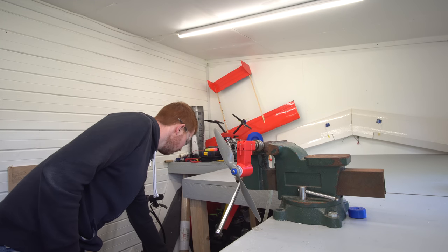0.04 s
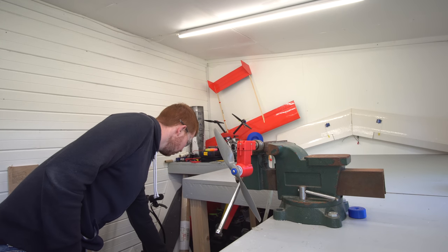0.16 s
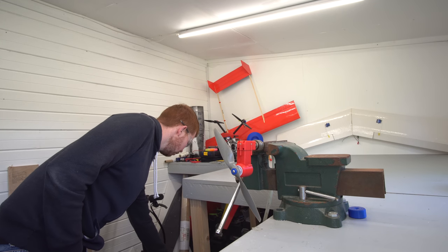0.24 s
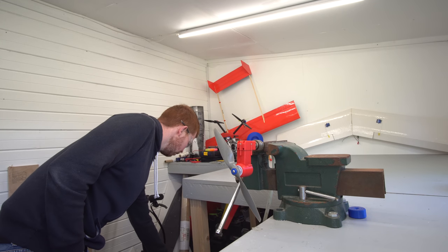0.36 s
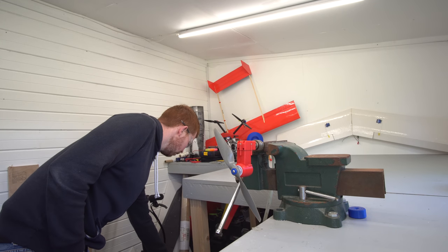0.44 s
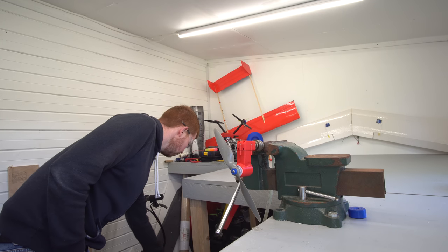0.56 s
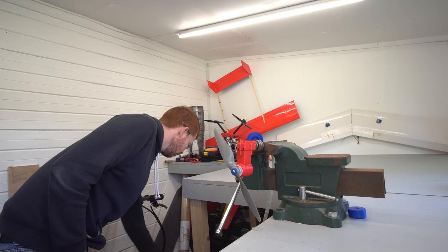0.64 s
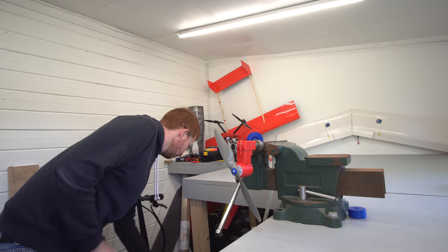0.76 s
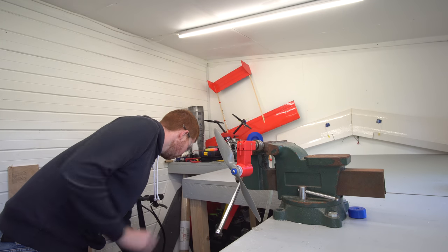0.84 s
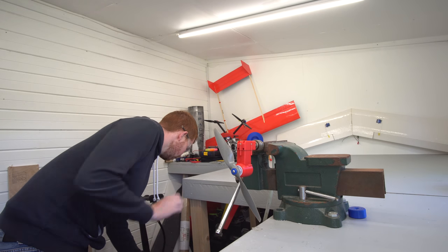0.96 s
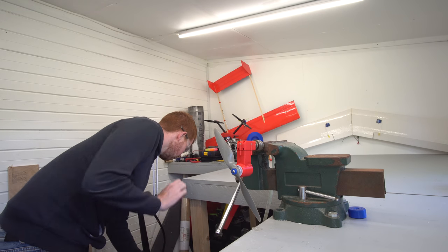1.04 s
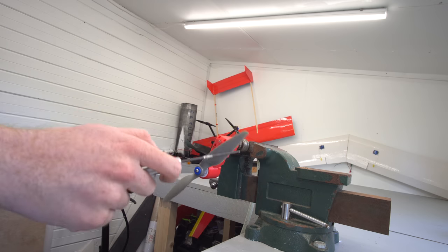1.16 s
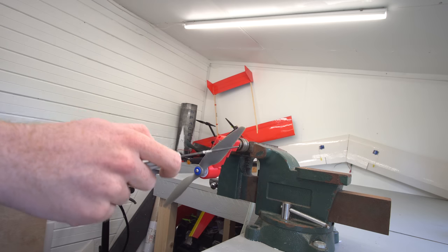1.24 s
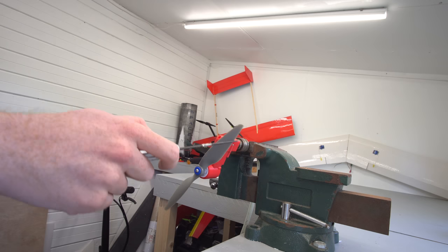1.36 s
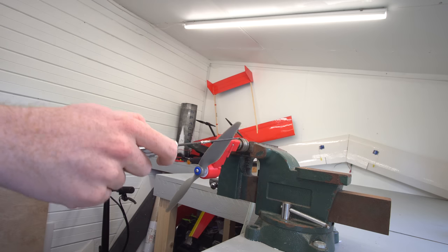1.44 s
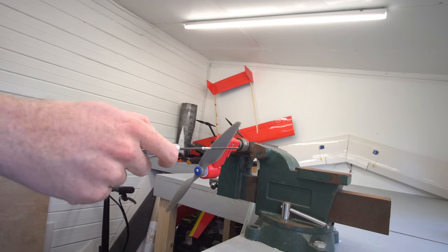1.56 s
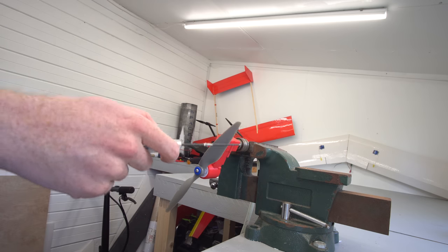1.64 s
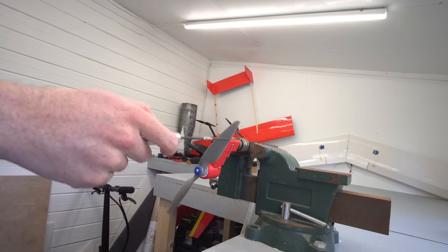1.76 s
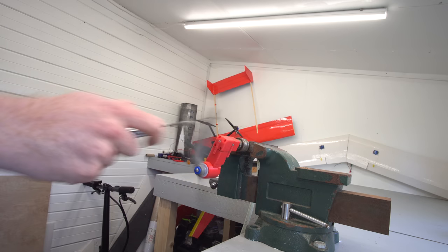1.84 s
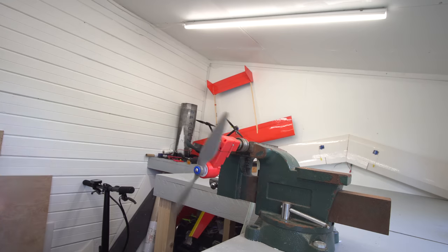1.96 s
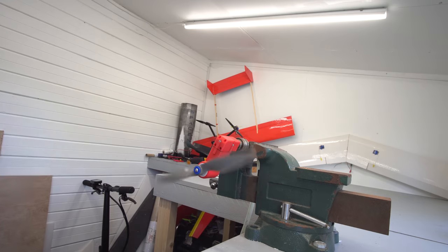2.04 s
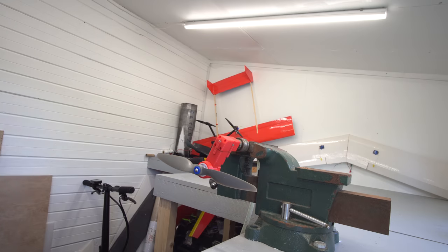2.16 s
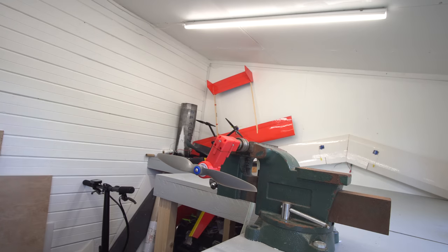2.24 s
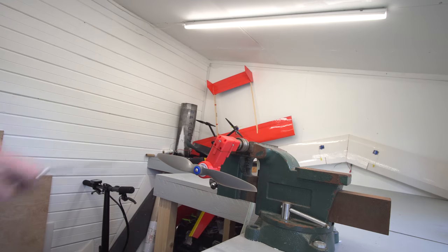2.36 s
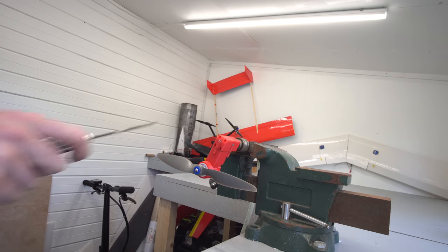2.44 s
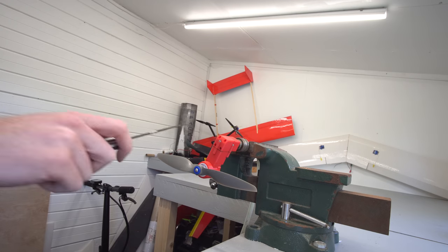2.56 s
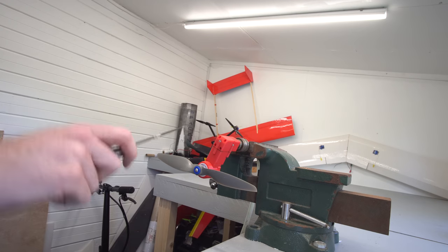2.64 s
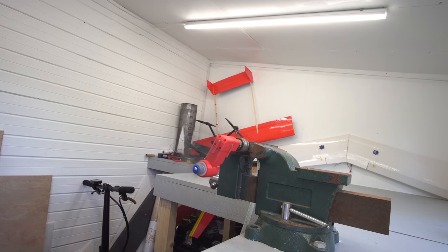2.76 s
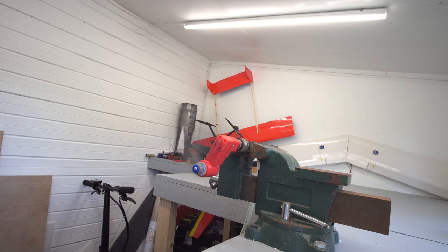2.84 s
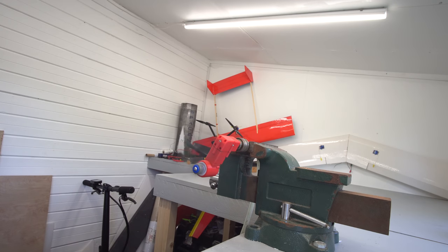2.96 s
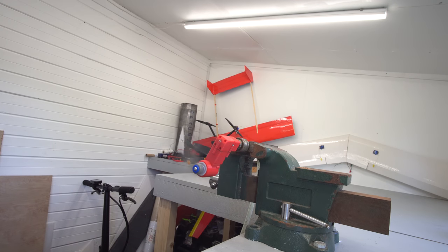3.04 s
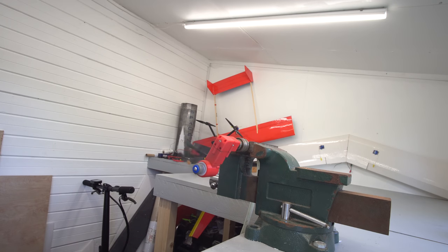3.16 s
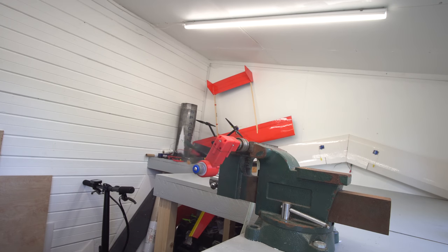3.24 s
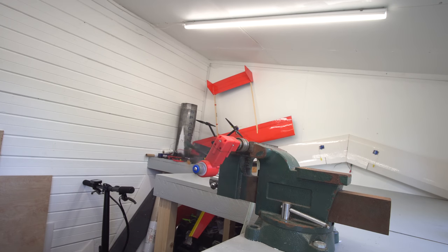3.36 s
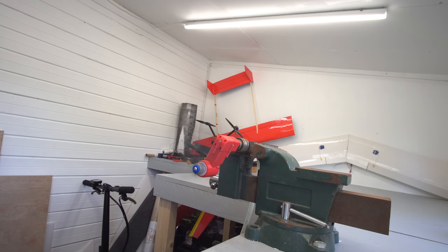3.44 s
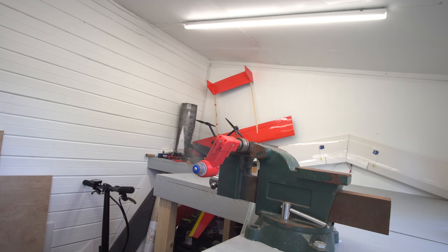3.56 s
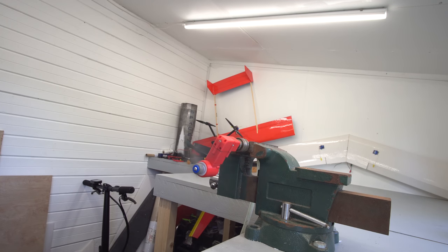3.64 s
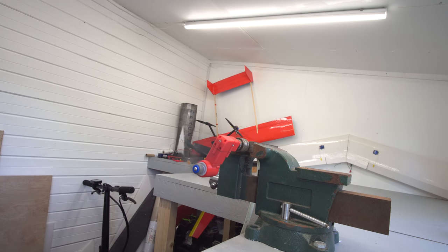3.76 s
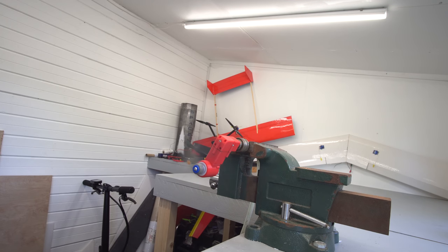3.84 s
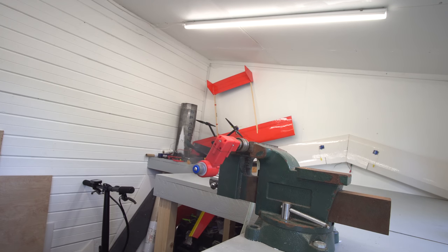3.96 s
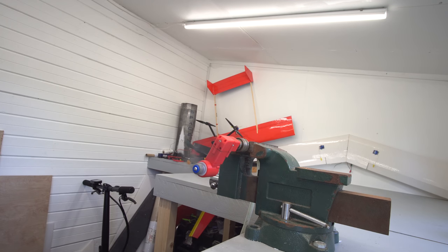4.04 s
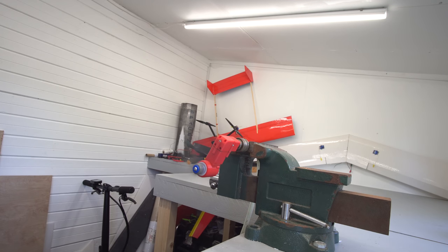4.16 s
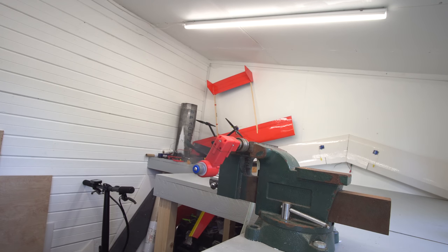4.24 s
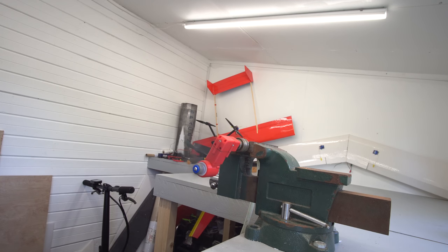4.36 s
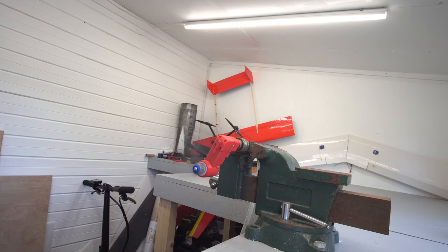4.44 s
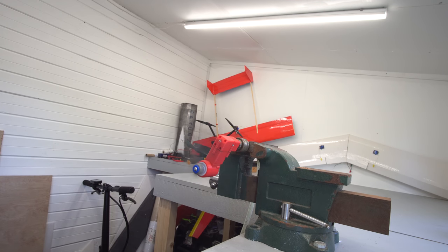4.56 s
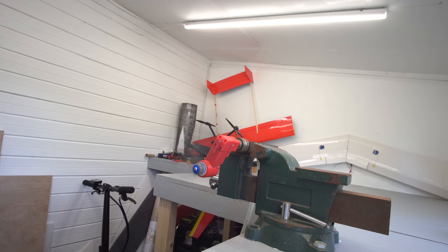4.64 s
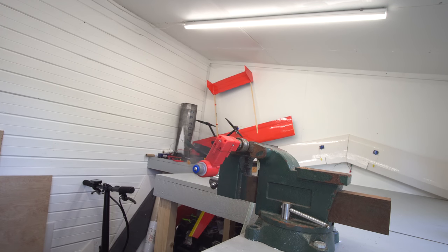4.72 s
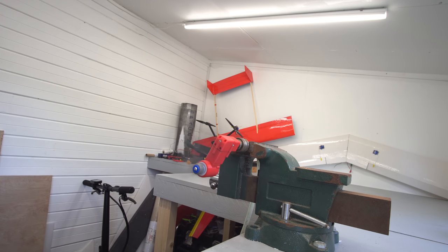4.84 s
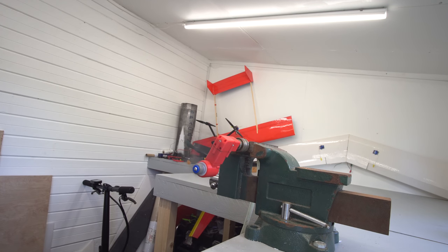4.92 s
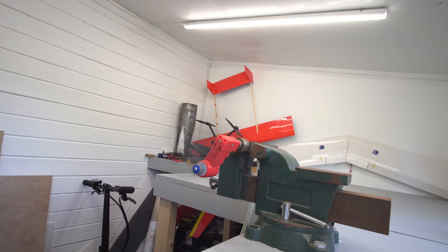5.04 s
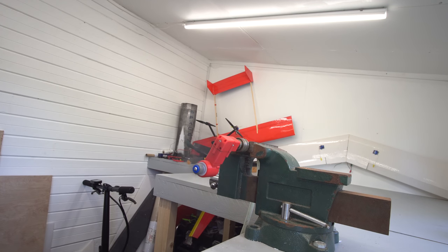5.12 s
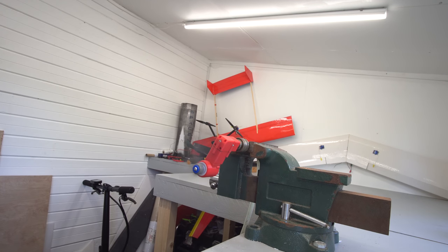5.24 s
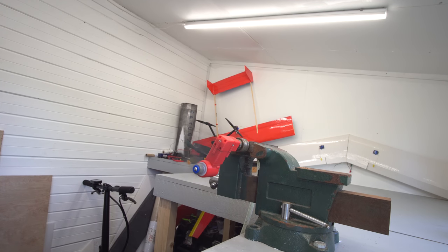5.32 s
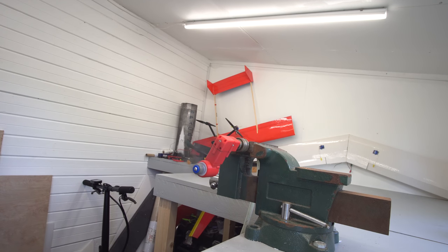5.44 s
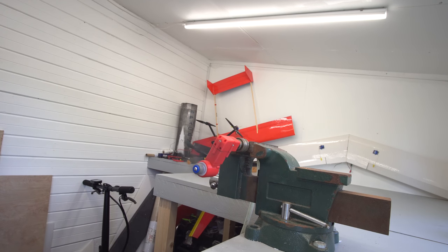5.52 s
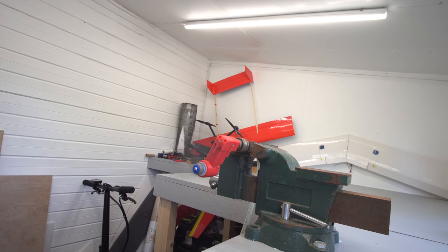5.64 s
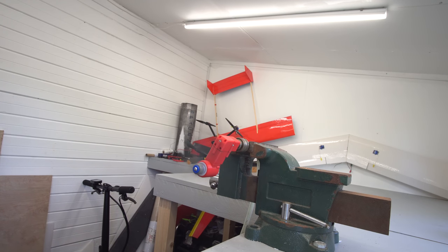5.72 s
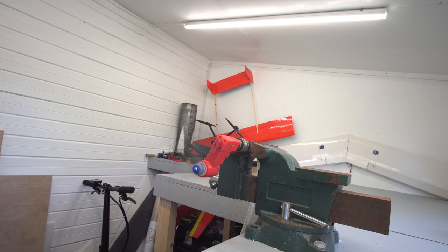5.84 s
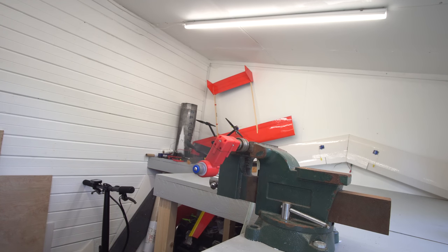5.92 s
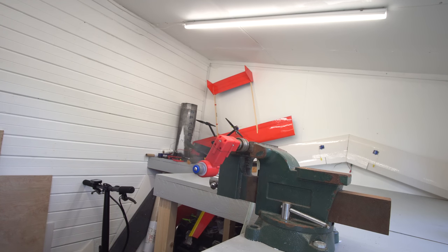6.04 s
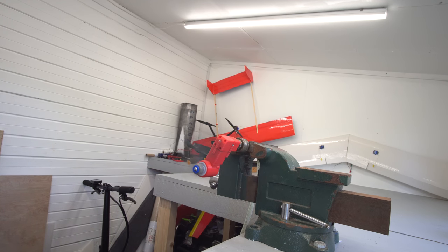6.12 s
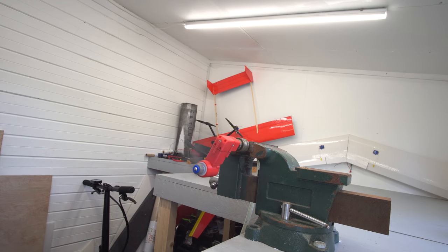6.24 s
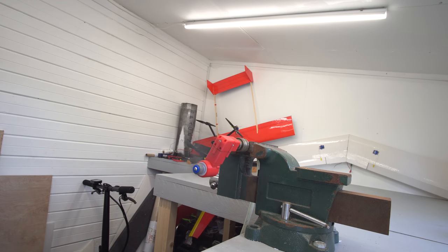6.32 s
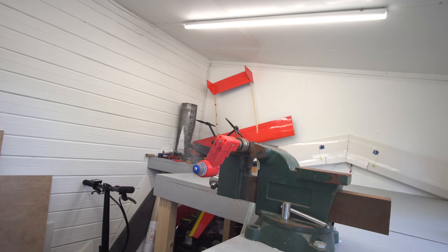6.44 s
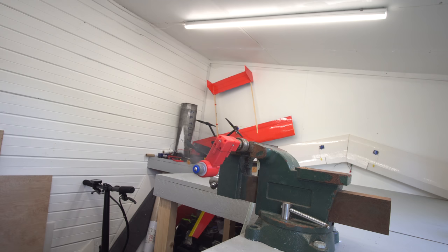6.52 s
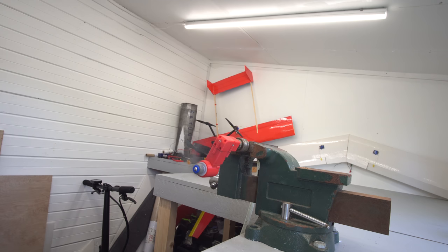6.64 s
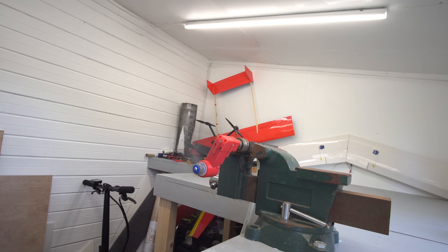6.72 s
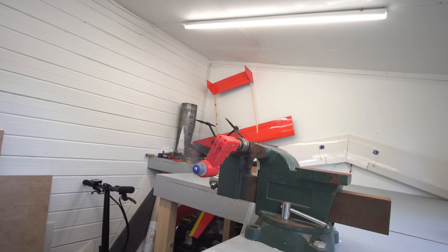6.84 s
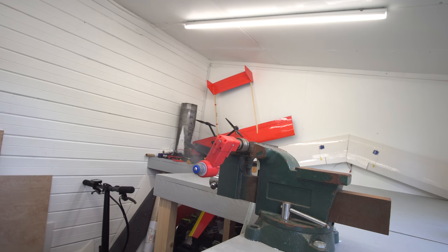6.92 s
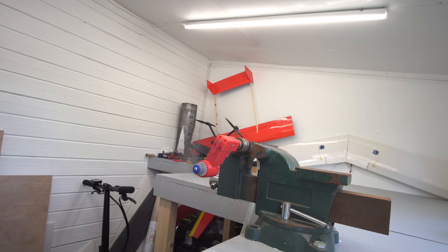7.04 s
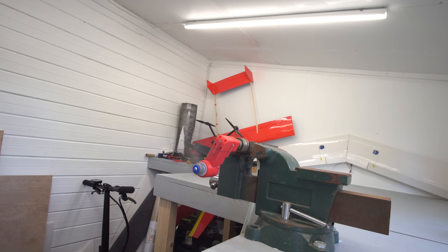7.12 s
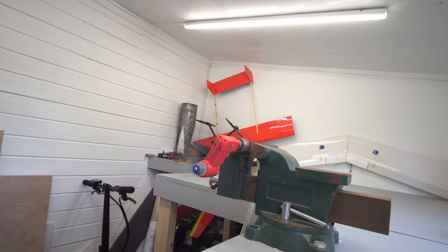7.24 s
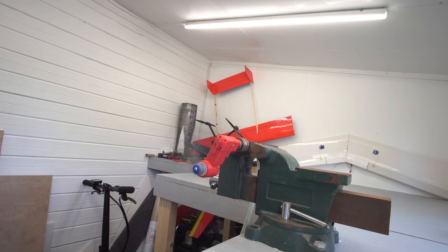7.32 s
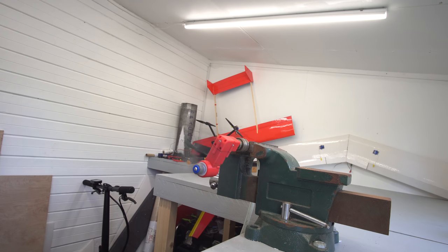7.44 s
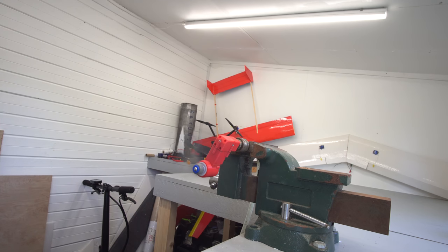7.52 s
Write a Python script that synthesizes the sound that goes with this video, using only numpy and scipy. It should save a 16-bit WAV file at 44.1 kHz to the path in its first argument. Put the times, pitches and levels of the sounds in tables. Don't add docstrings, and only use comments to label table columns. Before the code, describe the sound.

A steady motor-pump drone and casing roar stop at a hard cut, leaving a weak air leak. Light plastic ticks, a click with a spitting burst, a pause, another flick, and a tiny one-cylinder air motor springs into fast, dry, buzzing chatter. Metal clatters on the workbench while it runs, and the engine softens towards the end. Mono, close, slightly reverberant shed.

```python
import sys
import numpy as np
from scipy import signal
from scipy.fft import rfft, irfft, next_fast_len
from scipy.io import wavfile
from scipy.ndimage import uniform_filter1d

SR = 44100
rng = np.random.default_rng(int(sys.argv[2]) if len(sys.argv) > 2 else 0)


def level_to_linear(level):
    exponent = np.asarray(level, float) / 20
    return 10 ** exponent


def to_wav(sig):
    pcm = np.clip(np.atleast_2d(sig), -1, 1) * 32767
    pcm = np.round(pcm).astype(np.int16)
    wavfile.write(sys.argv[1], SR, pcm.T)


N = 334278
TIME = np.arange(N) / SR
CHANGE_S = 1.179

# t/s, speed/(turns per s)
ENGINE_SPEED = [(2.87, 39.363), (3.22, 43.272), (3.389, 42.543), (3.749, 43.619), (3.949, 42.511),
                (4.058, 42.164), (4.378, 43.218), (4.801, 41.968), (5.142, 42.927), (5.466, 42.132),
                (5.499, 41.625), (5.722, 42.741), (6.311, 42.548), (6.6, 42.92), (6.663, 42.612),
                (7.155, 42.359), (7.58, 42.788)]
FIRST_POP_S, START_LAG_HZ, SPIN_UP_S = 2.8662, 20.977, .06183
UNEVEN_TURNS, UNEVEN_HZ = .0012, 15
START_ROUGH = 14
# t/s, level/dB
PRESSURE = [(2.86, 0.5), (3.9, -0.55), (4.6, -1.3), (7.58, -6.5)]
# crank angle/turn, rate/(cycles per turn), level/dB, sign (+ push, - pull),
# lean/cycle (+ trough after, - before), share in the cylinder's ringing
PORT_STEPS = [(0, 12.66, 1.7, 1, .25, 0.23), (-0.2434, 11.6, -1, -0.81, 0.29, -0.054),
              (-0.0372, 16.7, -6, -0.7, -0.27, 0.68), (-0.1455, 16, -3.5, 1, -0.13, .99),
              (0.383, 18.7, -6.5, -1.14, -0.029, 0.024), (-0.364, 9.7, -12.5, 0.95, 0.25, 0.14),
              (0.1867, 13.4, -12.5, -1.17, -0.077, 0.31), (-0.266, 16.2, -16.5, -0.64, -0.19, -1.02),
              (0.325, 9.3, -20, 0.91, -0.31, -0.77)]
# multiple, level/dB, lead/turn
SHAFT_THRUST = [(1, -33.5, .03), (2, -21, 0.14), (3, -20, 0.041), (4, -24.5, 0.094)]
# f/Hz, width/Hz, level/dB
BODY_MODES = [(1752, 91, -3), (1940, 127, -3), (2239, 44, -13), (1540, 74, -19.5), (2690, 280, -13),
              (3804, 89, -12.5), (6085, 105, -8.5)]
# f/Hz, level/(dB per Hz)
JET_SPECTRUM = [(500, -17), (1000, -4.5), (1700, -9.5), (2500, -5), (3900, -8), (5400, -6.5), (6200, -7.5),
                (6900, -5.5), (8400, 1), (9200, -3), (10200, -12.5), (13500, -5), (14600, -12),
                (15500, -11.5)]
# f/Hz, level/(dB per Hz)
KNOCK_SPECTRUM = [(1000, -85), (2000, -5), (4000, -1.5), (6500, -4.5), (8400, 8), (10300, -5.5), (13500, 5),
                  (15500, -26)]
# level/dB, share of the pressure drop, loss at standstill/dB
THRUST, AIR, POPS, KNOCKING = (-11, 0.93, 8), (-22, 0.96, 17), (-23.5, 1.17, 2.7), (-13.5, 0.99, 6.5)
RING_DB, RING_DB_PER_HZ, RING_PER_PRESSURE = -5.5, -5, -1.52
RING_LAG_DB, RING_LEAST_DB = -140, -14

# peak t/s, level/dB, rise/s, fall/s
GUSTS = [
    (1.972, -22.5, .004, 0.0097),
    (1.999, -25.5, 0.015, 0.012),
    (2.012, -15, .003, .006),
    (2.024, -21, 0.0046, 0.035),
    (2.812, -28.5, .0005, 0.037),
    (2.855, -21.5, 0.0017, 0.012),
]
# f/Hz, level/(dB per Hz)
VENT_SPECTRUM = [(40, -8), (110, 1.5), (190, -12), (330, -3.5), (490, -14), (660, -2.5), (1550, -12),
                 (2150, -9), (4400, -9.5), (6300, -7), (7300, -9.5), (8700, -1), (10300, -15.5),
                 (13300, -13), (15500, -24)]
# t/s, level/dB, f/Hz
LONE_POP = (1.9805, -10.5, 430)

# t/s, peak level/dB, f/Hz, t60/s, crack relative level/dB
FLICKS = [
    (1.9986, -8.5, 2170, 0.013, 8.5),
    (1.999, -20, 8600, .015, -3),
    (2.8089, -6, 1940, 0.021, -6),
    (2.81, -18, 2110, 0.02, 7),
    (2.8156, -16, 3100, 0.015, 0),
    (2.81, -16.5, 980, 0.071, -8),
    (2.812, -20, 454, 0.066, -10),
]
# t/s, peak level/dB, f/Hz
CLATTER = [(4.782, -4, 2600), (4.7827, -6, 1920), (4.7826, -14, 3270), (4.7835, -22, 960),
           (4.794, -9, 2330), (4.795, -18, 1540), (4.807, -4, 1500), (4.832, -9, 1290), (4.854, -6, 990),
           (4.865, -20, 1580), (4.881, -9, 1824), (4.907, -9, 1290), (4.927, -11, 1430), (4.951, -20, 1150)]
TOOL_T60_S, TOOL_CRACK_DB = 0.038, -18
# t/s, peak level/dB
POKES = [(1.395, -49), (1.425, -48), (1.584, -44), (1.6, -41), (1.612, -39), (1.79, -39), (1.822, -54),
         (1.919, -42), (1.93, -43), (1.945, -41), (2.104, -48)]
# f/Hz, level/dB, t60/s
BLADE_MODES = [(390, -3, .035), (640, -7, .11), (868, -0.5, 0.096), (1170, -5, 0.088), (2040, -4, .05)]
BLADE_CRACK_DB = -16
# peak t/s, level/dB, centre f/Hz, fall/s
RATTLE = [
    (4.797, -13.5, 1900, .03),
    (4.86, -22.5, 1560, 0.098),
    (1.42, -65, 750, .025),
    (1.61, -56, 870, 0.027),
    (1.795, -59, 900, 0.026),
    (1.925, -51, 776, .1),
]
SHAKE_RISE_S, SETTLE_S, SETTLED = 0.0087, 0.027, 0.94

# multiple, level/dB
PUMP_ORDERS = [(1, -4), (2, -3), (3, -6), (4, -20), (5, -6), (6, -12), (7, 1), (8, -8.5), (9, -2.5),
               (10, -7), (11, -4), (12, -2.5), (13, -27), (14, -2), (15, -3.5), (16, 0), (17, -1.5),
               (18, -7.5), (19, -10), (20, -7.5), (21, -8), (22, -15.5), (23, -42), (24, -10), (25, -31),
               (26, -10.5), (27, -12), (28, -8), (29, -26), (30, -11)]
# f/Hz, level/(dB per Hz)
PUMP_ROAR = [(35, -35), (60, -18), (149, -34), (187, -48), (335, -14), (385, -12.5), (613, -6.5), (810, 0),
             (1150, -9.5), (1910, -8.5), (3050, -7.5), (4220, -1), (6710, -2), (15500, -23)]
# f/Hz, width/Hz, level/dB
CASING_MODES = [(1924, 7.7, -8), (2136, 3.4, -7), (2450, 6.6, -4), (3560, 75, -3), (4360, 300, 4),
                (4900, 98, -1.5), (5600, 89, -4), (6820, 90, -5)]
# f/Hz, level/dB
MAINS_HUM = [(450.5, -13), (500, -21)]
PUMP_HZ, PUMP_DB = 47.83, -20.5
PUMP_SAG_DB_PER_S, ROAR_SAG_DB_PER_S = 1.43, 0.7
BUZZ = 0.55

# f/Hz, level/(dB per Hz)
LEAK_SPECTRUM = [(18, -33), (30, 5), (43, -14), (75, -5), (124, -14), (1570, -31), (2390, -11),
                 (3640, -26.5), (5680, -13), (6150, -18), (7300, -3), (8200, -1), (9600, -14.5),
                 (10900, -6), (11800, -8), (15800, -11)]
LEAK_DB, LEAK_SAG_DB_PER_S = -37.5, 1.1
# f/Hz, t60/s
SHED_DECAY = [(100, 0.75), (1000, 0.38), (8000, 0.02)]


def evened(x):
    return x / np.sqrt(np.mean(x ** 2) + 1e-20)


def read(points, hz):
    f, value = np.transpose(points)
    return np.interp(np.log(hz + 1), np.log(f + 1), value)


def columns(rows):
    s, *values = np.transpose(rows)
    return [np.interp(TIME, s, v) for v in values]


def coloured(x, points):
    size = next_fast_len(len(x))
    hz = np.fft.rfftfreq(size, 1 / SR)
    shaped = irfft(rfft(x, size) * level_to_linear(read(points, hz)), size)
    return evened(shaped[:len(x)])


def drift(rate_hz):
    return evened(signal.lfilter([1], [1, -np.exp(-2 * np.pi * rate_hz / SR)], rng.standard_normal(N)))


def ring(x, hz, width):
    r, w = np.exp(-np.pi * width / SR), 2 * np.pi * hz / SR
    return signal.lfilter([0, r * np.sin(w)], [1, -2 * r * np.cos(w), r * r], x)


def clicks(s, size):
    at = np.round(np.asarray(s) * SR).astype(int)
    keep = at < N
    return np.bincount(at[keep], (size * np.ones(len(at)))[keep], N)


def puff(u, lean):
    return np.cos(2 * np.pi * u) * np.exp(-((u - lean) / .45) ** 2)


def burst(train, rise_s, fall_s):
    t = np.arange(-600, 601) / SR
    shape = np.exp(np.where(t < 0, t / rise_s, -t / fall_s))
    return signal.oaconvolve(train, shape, "same")


def swell(s, rise_s, fall_s):
    u = TIME - s
    return np.exp(np.where(u < 0, u / abs(rise_s), -u / abs(fall_s)))


def crank():
    settled = columns(ENGINE_SPEED)[0]
    lag = START_LAG_HZ * np.exp(-np.maximum(TIME - FIRST_POP_S, 0) / SPIN_UP_S)
    turns = np.cumsum(settled - lag) / SR
    wander = evened(uniform_filter1d(drift(UNEVEN_HZ), size=600))
    uneven = UNEVEN_TURNS * (1 + START_ROUGH * lag / settled) * wander
    return settled, lag, turns - turns[round(FIRST_POP_S * SR)] + uneven


def engine():
    settled, lag, free = crank()
    turns, whole = np.maximum(free, -1), np.arange(1, free[-1] + 1)
    slowness = lag / settled
    sluggish = np.sqrt(np.clip(42.6 / (settled - lag), 1, 2))
    pressure_db = columns(PRESSURE)[0]
    usual_hz = np.median(settled)
    unready_db = np.clip(RING_LAG_DB * (.985 - (settled - lag) / usual_hz), RING_LEAST_DB, 0)
    ringing_db = RING_DB + RING_DB_PER_HZ * np.clip(settled - usual_hz, -.8, 1)
    ringing_db = ringing_db + RING_PER_PRESSURE * pressure_db + unready_db
    thrust_db, jet_db, pop_db, rattle_db = [db + share * pressure_db - loss_db * slowness
                                            for db, share, loss_db in (THRUST, AIR, POPS, KNOCKING)]
    chance = rng.standard_normal((len(whole) + 4, 16))

    def train(angle, k, jitter_s, spread_db):
        at = np.interp(whole + angle, free, TIME, right=N) + jitter_s * chance[:len(whole), k]
        return clicks(at, level_to_linear(spread_db * chance[:len(whole), k + 1]))

    steps = np.zeros(N)
    for k, (angle, cycles, db, sign, lean, share) in enumerate(PORT_STEPS):
        turn = np.round(turns - angle)
        luck = chance[turn.astype(int) + 1, k]
        step_db = db + share * ringing_db + (.5 + 5 * slowness) * luck
        begun = turn >= (angle < 0)
        steps += sign * level_to_linear(step_db) * puff((turns - angle - turn) * cycles * sluggish, lean) * begun
    steps = signal.sosfiltfilt(signal.butter(3, 170, "high", fs=SR, output="sos"), steps)
    thrust = sum(level_to_linear(db) * np.cos(2 * np.pi * k * (turns + lead)) for k, db, lead in SHAFT_THRUST)

    knocks, spits = train(-.21, 8, .00015, 1), train(-.335, 10, .00025, 2.5)
    gating = .8 + .5 * burst(knocks, .002, .006) + .6 * burst(spits, .0003, .0015)
    hiss = coloured(rng.standard_normal(N), JET_SPECTRUM) * gating
    grit = rng.choice([-1., 1.], N) * (burst(knocks, .0002, .0007) + .3 * burst(spits, .0002, .0006))
    snap = coloured(grit + 1.1 * knocks, KNOCK_SPECTRUM)

    blows = train(-.21, 12, .00002, 0.96) + 0.39 * train(0.27, 14, .00004, 0.85)
    blows = blows + 0.22 * train(-.02, 6, .00006, 0.58) + .3 * spits
    body = sum(level_to_linear(db) * ring(blows, hz, width) for hz, width, db in BODY_MODES)
    rumble_band = signal.butter(1, [200, 1000], "band", fs=SR)
    rumble = evened(signal.lfilter(*rumble_band, rng.standard_normal(N)))

    on = np.clip((TIME - FIRST_POP_S - .005) / 0.015, 0, 1)
    air = level_to_linear(jet_db + 1.5) * hiss + level_to_linear(jet_db - 2.0) * snap
    moving = level_to_linear(thrust_db) * thrust + air + level_to_linear(pop_db - 12.5) * rumble + level_to_linear(rattle_db) * body
    return level_to_linear(pop_db + 14.5) * steps + on * moving


def vent():
    rush = coloured(rng.standard_normal(N), VENT_SPECTRUM) * level_to_linear(3.5 + drift(60))
    level = np.sqrt(sum((level_to_linear(db) * swell(s, rise_s, fall_s)) ** 2 for s, db, rise_s, fall_s in GUSTS))
    s, db, hz = LONE_POP
    return rush * level + level_to_linear(db) * puff((TIME - s) * hz, 0.11)


def hits():
    out = np.zeros(N)
    t = np.arange(4000) / SR
    crack_band = signal.butter(1, [1500, 10000], "band", fs=SR)
    tool = [(*row, TOOL_T60_S, TOOL_CRACK_DB) for row in CLATTER]
    blade = [(s, db + part_db + 3 * rng.standard_normal(), hz, t60, BLADE_CRACK_DB)
             for s, db in POKES for hz, part_db, t60 in BLADE_MODES]
    for s, db, hz, t60, crack_db in FLICKS + tool + blade:
        rough = 1 + .5 * uniform_filter1d(rng.standard_normal(len(t)), 20) * np.sqrt(20)
        tone = np.sin(2 * np.pi * hz * t) * level_to_linear(-60 * t / t60) * np.minimum(t / 0.00062, 1) * rough
        noise = signal.lfilter(*crack_band, rng.standard_normal(len(t)))
        crack = level_to_linear(crack_db + 5.0 - 60 * t / 0.013) * noise
        part = out[round(s * SR):][:len(t)]
        part += level_to_linear(db - 7) * (tone + crack)[:len(part)]
    return out


def rattle():
    ticks = rng.standard_normal(N) * level_to_linear(4.5 * drift(150))
    out = np.zeros(N)
    for s, db, hz, fall_s in RATTLE:
        centre = hz * (SETTLED + (1 - SETTLED) * np.exp(-np.maximum(TIME - s, 0) / SETTLE_S))
        carrier = np.exp(2j * np.pi * np.cumsum(centre) / SR)
        smooth = signal.lfilter(*signal.butter(2, 600, fs=SR), ticks / carrier)
        out += level_to_linear(db) * evened((carrier * smooth).real) * swell(s, SHAKE_RISE_S, fall_s)
    return out


def compressor():
    level_db, roar_db = PUMP_DB - PUMP_SAG_DB_PER_S * TIME, -ROAR_SAG_DB_PER_S * TIME
    turns = PUMP_HZ * TIME + 0.003 * drift(1)

    trials = rng.random((300, len(PUMP_ORDERS)))
    z = level_to_linear(np.transpose(PUMP_ORDERS)[1]) * np.exp(2j * np.pi * trials)
    throb = sum(abs((z[:, n:] * z[:, :-n].conj()).sum(1)) for n in range(1, 4))
    lags = trials[np.argmin(throb)]
    hum = sum(level_to_linear(db + 1.6 * drift(1.6)) * np.cos(2 * np.pi * (k * turns + lag))
              for (k, db), lag in zip(PUMP_ORDERS, lags))
    hum = hum + sum(level_to_linear(db) * np.cos(2 * np.pi * hz * TIME) for hz, db in MAINS_HUM)

    taps = clicks(np.arange(.0075, 1.2, 1 / PUMP_HZ), level_to_linear(0.52 * rng.standard_normal(60))[:58])
    drive = rng.standard_normal(N) * (1 + 0.21 * burst(taps, 0.00022, 0.00087)) + 10.0 * taps
    order = np.arange(513)
    phases = np.exp(2j * np.pi * rng.random(513) - order / 40)
    cycle = irfft(phases * rng.uniform(.2, 1, 513) * (order > 30))
    drive = drive + BUZZ * np.interp(turns % 1, np.arange(1024) / 1024, evened(cycle), period=1)
    casing = sum(level_to_linear(db) * evened(ring(drive, hz, width * 0.45 + 30)) for hz, width, db in CASING_MODES)
    roar = coloured(drive, PUMP_ROAR) + level_to_linear(-5.5) * casing / np.sqrt(len(CASING_MODES))

    fade = np.clip((CHANGE_S - TIME) / 0.0034, 0, 1)
    return level_to_linear(level_db) * fade * (level_to_linear(2.5) * evened(hum) + level_to_linear(roar_db + 1.5) * roar)


def leak():
    level_db = LEAK_DB - LEAK_SAG_DB_PER_S * (TIME - CHANGE_S)
    fade = np.clip((TIME - CHANGE_S) / 0.01, 0, 1)
    return fade * level_to_linear(level_db + 0.37 * drift(24)) * coloured(rng.standard_normal(N), LEAK_SPECTRUM)


def shed(x):
    taps = np.zeros(SR // 2)
    at = np.arange(150, len(taps) - 20, 20)
    taps[at + rng.integers(0, 20, len(at))] = rng.choice([-1., 1.], len(at))
    hz, t, z = signal.stft(taps, SR, nperseg=256)
    decay = level_to_linear(-60 * t / read(SHED_DECAY, hz)[:, None])
    tail = signal.istft(z * decay, SR, nperseg=256)[1]
    return signal.oaconvolve(x, tail / np.linalg.norm(tail))[:N]


def scene():
    motor, rush, struck = engine(), vent(), hits() + rattle()
    thin = signal.lfilter(*signal.butter(3, 1100, "high", fs=SR), motor + rush)
    room = shed(level_to_linear(-13) * thin + level_to_linear(-17.0) * struck)
    mix = compressor() + leak() + motor + rush + struck + room
    return np.array([mix, mix])


def top_cut(x):
    return signal.sosfilt(signal.butter(12, 16490, fs=SR, output="sos"), x)


def record(dry):
    edge = signal.firwin(511, 15900, window=("kaiser", 9), fs=SR)
    held = signal.oaconvolve(np.tanh(dry / .9) * .9, edge[None], "same")
    return top_cut(held)


dry = scene()
out = record(dry)
to_wav(out)
```